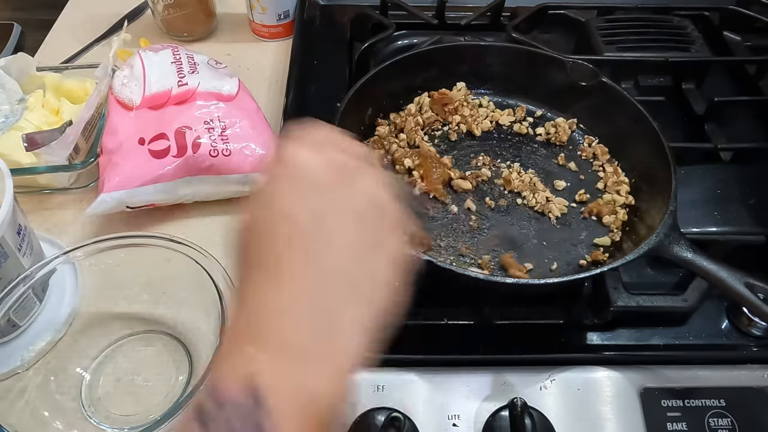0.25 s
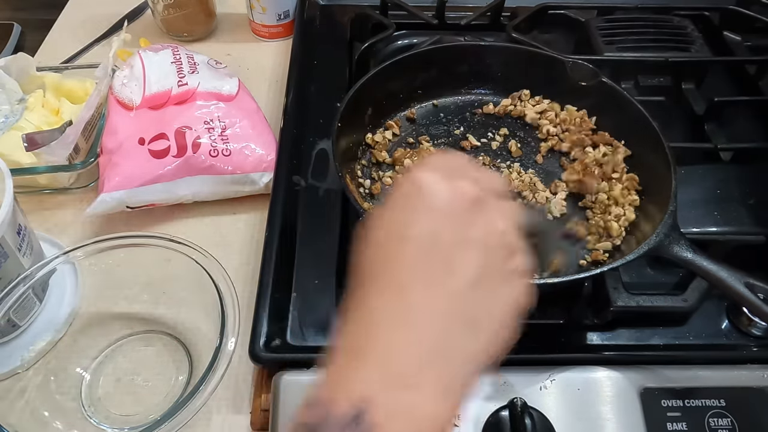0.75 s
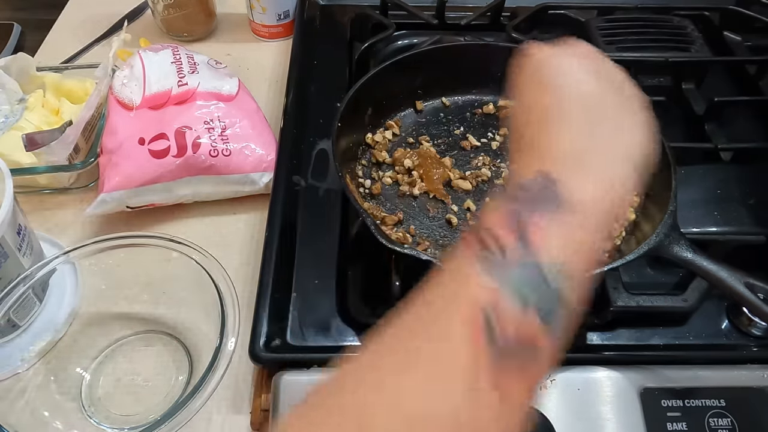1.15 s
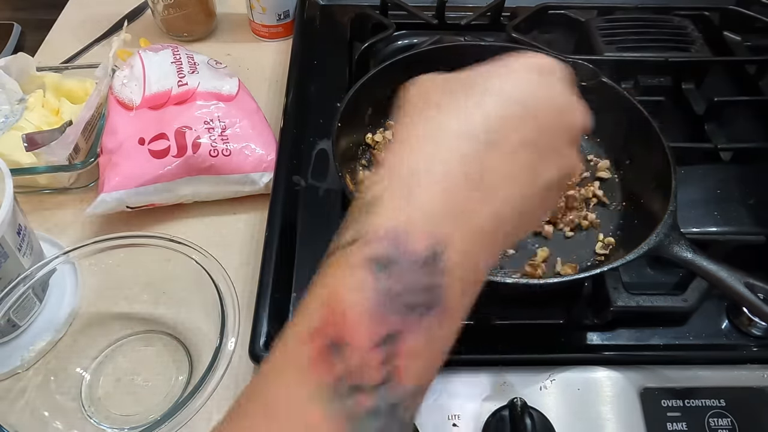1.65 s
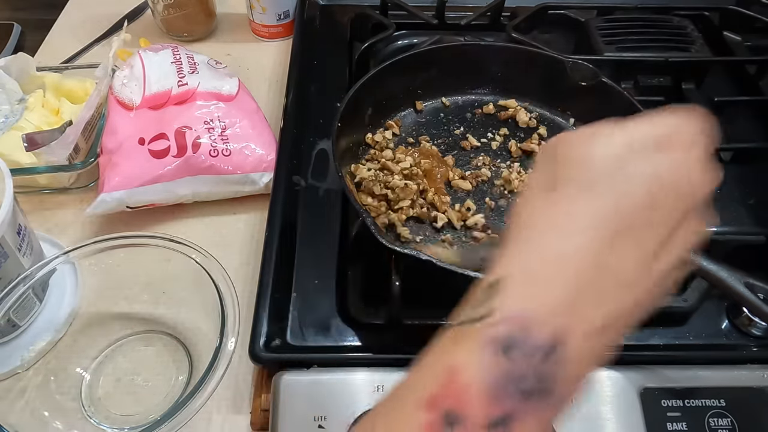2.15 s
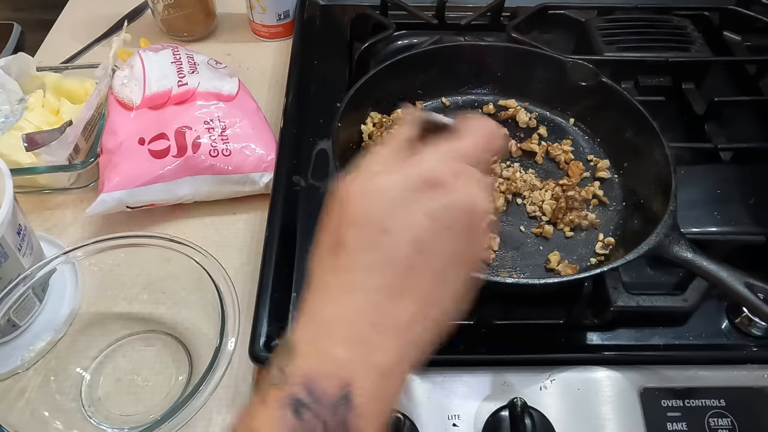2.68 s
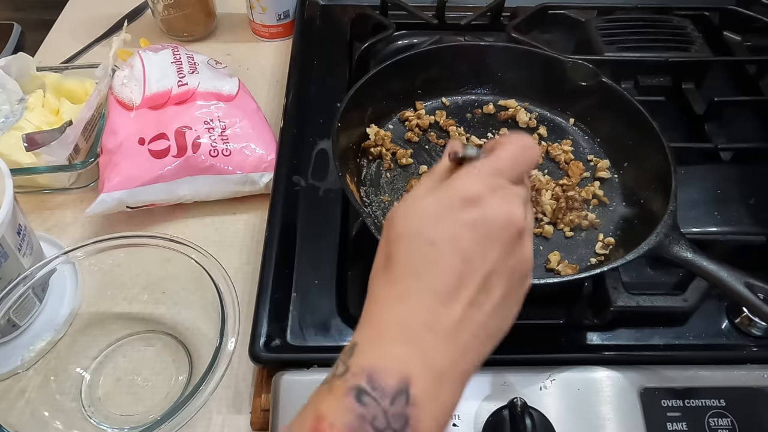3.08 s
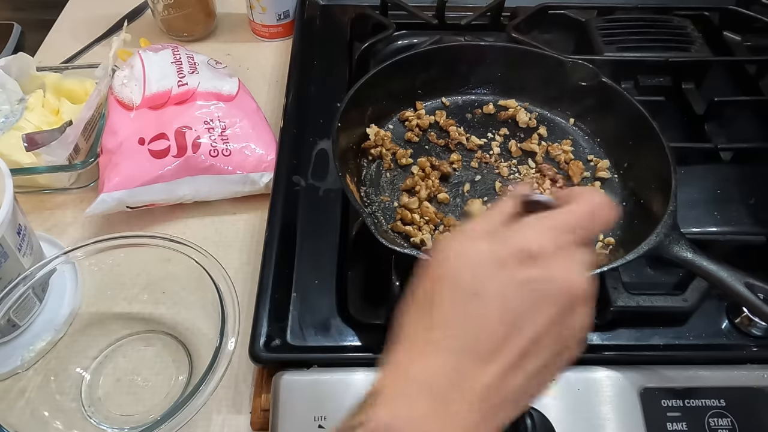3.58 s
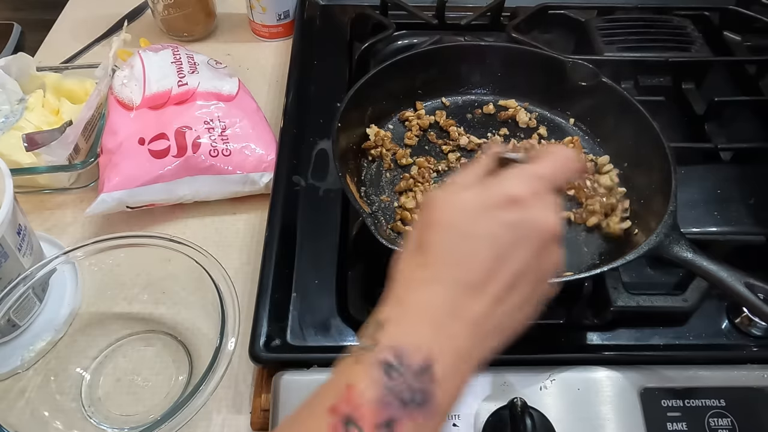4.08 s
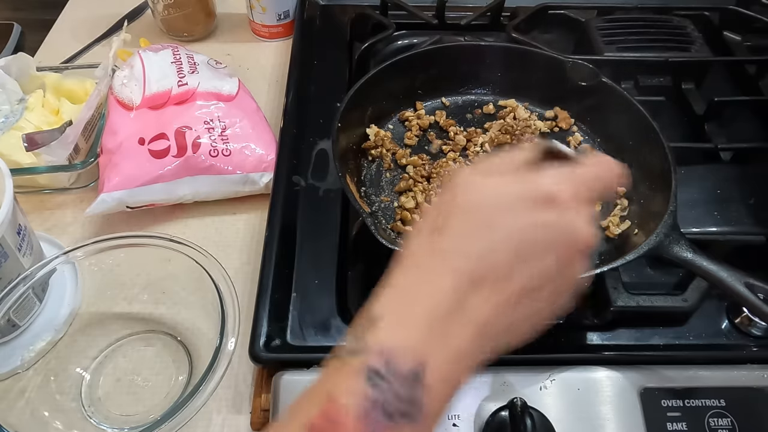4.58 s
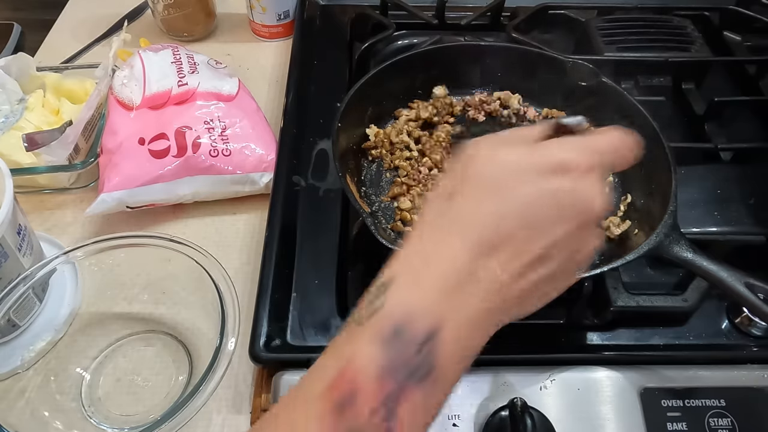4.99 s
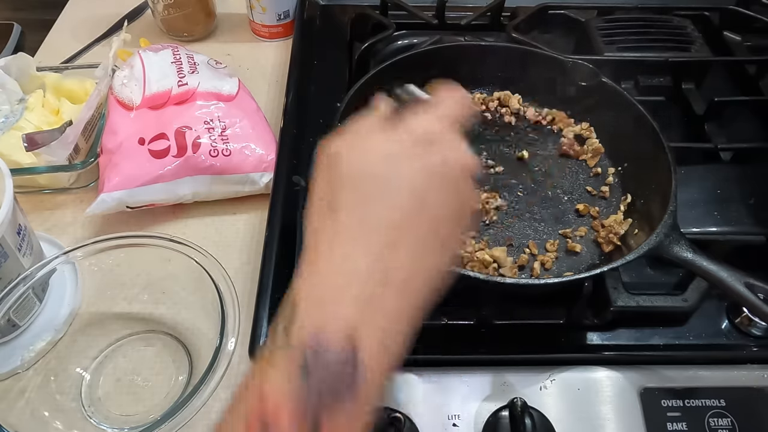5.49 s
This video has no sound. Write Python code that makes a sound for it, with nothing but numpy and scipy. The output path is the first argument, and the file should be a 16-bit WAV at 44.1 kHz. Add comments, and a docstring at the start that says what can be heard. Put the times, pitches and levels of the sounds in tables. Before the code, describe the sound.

Close stereo sound of a small kitchen: honeyed nuts sizzle and spit steadily in an iron skillet, slightly right. A metal spoon scrapes busily in the first second with small squeaks and clinks, then a bright rim strike, short bursts around one and a half and two seconds, a sparse frying stretch, another scrape, a sharp ringing clank at four seconds and a few late light taps over low room hum.

```python
"""A small kitchen: chopped walnuts and honey sizzle gently in a cast-iron skillet on a gas stove.
A metal spoon scrapes by stick and slip, squeaks, crunches nuts, and strikes the floor and rim of the iron.
Honey crackles as many small bubbles burst, larger ones spit, and the finest merge into hiss.
Hard pushes shift the skillet on its grate, and the sheet-metal stove top booms, groans and rattles.
Two microphone ports hear the pan a little to the right, with short reflections and a low room hum."""
import sys
import numpy as np
from scipy import signal
from scipy.fft import rfft, irfft
from scipy.io import wavfile
from scipy.ndimage import uniform_filter1d, map_coordinates

SR = 44100
rng = np.random.default_rng(int(sys.argv[2]) if len(sys.argv) > 2 else 0)


def bounce(signal):
    """Save signal as a 16-bit WAV file at the path given by the first command-line argument."""
    frames = np.transpose(np.atleast_2d(signal))
    limited = np.clip(frames, -1, 1)
    pcm = np.round(limited * 32767).astype(np.int16)
    wavfile.write(sys.argv[1], SR, pcm)


N = 253134  # samples

# All db columns are relative: settings in the functions and the microphone placing shift them further.
# Spoon strokes on the iron: start_s, length_s, judder_db, scrape_db, whine_db, grit_db
STROKE_TABLE = [(0.025, 0.075, -53, -43.5, -42.5, -45), (0.102, 0.089, -39, -36, -39.5, -50),
                (0.148, 0.036, -28, -20.5, -29, -27.5), (0.188, 0.01, -32, -16, -27, -38),
                (0.214, 0.026, -38, -25.5, -30, -30), (0.242, 0.006, -43, -32, -38, -50),
                (0.292, 0.061, -51, -58, -37.5, -55), (0.352, 0.035, -51, -32.5, -35.5, -35.5),
                (0.386, 0.009, -49, -34, -38, -42), (0.454, 0.11, -51, -48, -45, -44),
                (0.544, 0.039, -52, -34, -38.5, -33), (0.6, 0.017, -48, -27.5, -39, -34),
                (0.64, 0.13, -49, -42.5, -46, -51), (0.744, 0.015, -40, -32.5, -33, -50),
                (0.774, 0.0095, -34.5, -24.5, -30, -54), (0.8, 0.008, -36, -34, -29, -52),
                (0.812, 0.031, -36.5, -26, -32.5, -39.5), (0.843, 0.021, -52, -40, -41, -38),
                (1.162, 0.059, -38, -38.5, -44.5, -53), (1.24, 0.076, -40.5, -46, -50, -42),
                (1.439, .035, -49, -34, -50, -50), (1.475, 0.048, -52, -29, -37, -37.5),
                (1.526, 0.064, -49, -29.5, -31.5, -34.5), (1.594, 0.045, -32, -41, -35, -39),
                (2.112, .022, -26, -29, -40, -52), (2.175, 0.045, -36.5, -32, -34, -38.5),
                (2.229, 0.074, -41, -43, -35, -40), (2.338, 0.1, -51.5, -59, -48.5, -46.5),
                (2.629, 0.031, -47.5, -52, -40, -44), (2.648, 0.043, -54, -41, -47, -44),
                (3.492, 0.091, -52, -58, -68, -67), (3.785, 0.029, -33.5, -37, -30, -49),
                (3.82, 0.038, -29.5, -37, -50, -40), (4.107, .055, -40, -43, -42, -42),
                (4.17, 0.037, -33.5, -38, -32, -36), (4.227, 0.069, -32.5, -43, -41, -45),
                (4.679, 0.048, -41.5, -48, -51, -47), (4.704, 0.043, -51, -47, -39, -41.5),
                (4.736, 0.015, -53.5, -35, -46, -54), (4.879, 0.04, -50, -43, -48, -45),
                (4.928, 0.066, -44.5, -39.5, -39.5, -43), (5.005, 0.045, -29.5, -35, -39.5, -41),
                (5.286, 0.012, -62, -45, -41.5, -44.5), (5.424, 0.014, -68, -44, -39, -43)]
# Resonances of the spoon pressed on the iron, low to high, four tables: pitch_hz, width_hz, level_db
JUDDER_MODES = [(621, 18.7, 0.5), (687.3, 22, 1), (792.5, 29, -4)]
SCRAPE_MODES = [(1206, 39.3, 3), (1231, 29.5, 5.5), (1285, 29, -1), (1366, 95, -11.5)]
WHINE_MODES = [(1833.5, 12.4, 7), (1912, 26, 4), (2030, 275, -7)]
GRIT_MODES = [(2715, 50, 6), (2820, 74, 3), (3280, 58, 2.5), (3790, 190, -6.5), (4100, 61, 0),
              (4775, 53, -7), (4950, 53, -3), (5400, 33, -10), (6230, 46, -8)]
# Moments when slipping locks onto one resonance: middle_s, length_s, pitch_hz, level_db
SQUEAK_TABLE = [(0.199, .013, 1240, -20), (0.237, 0.012, 2800, -33), (.374, 0.0087, 2760, -32),
                (.404, .022, 3340, -34), (0.417, 0.021, 1890, -30.5), (.782, .016, 1900, -32),
                (0.841, 0.021, 2900, -35), (1.265, 0.026, 3900, -34), (1.268, 0.03, 7250, -37.5),
                (1.514, 0.0097, 1230, -24.5), (1.508, 0.018, 2790, -28.5), (1.577, 0.028, 1235, -28.5),
                (1.59, 0.012, 2800, -31), (1.594, 0.012, 4740, -31), (2.197, .028, 2770, -30.5),
                (2.237, 0.012, 3930, -35.5), (3.849, 0.019, 690, -29), (4.24, 0.017, 792, -32),
                (4.26, 0.017, 730.5, -33)]
# The spoon leaves the iron and rings freely: start_s, level_db
LIFT_TABLE = [(.9, -45), (3.91, -32.5), (4.31, -38), (5.1, -41)]
# Nut pieces crunching under the spoon: middle_s, length_s, level_db
CRUNCH_TABLE = [(0.183, 0.017, -51), (0.39, .05, -48), (0.576, 0.028, -46), (1.136, 0.03, -37),
                (1.271, 0.027, -35), (1.563, 0.091, -45), (2.23, 0.038, -38.5), (2.3, 0.039, -40.5),
                (4.202, 0.033, -59), (4.925, 0.072, -41.5), (5.026, 0.071, -38.5), (5.402, 0.021, -49)]
# Spoon blows and skillet bumps on the grate: start_s, level_db, contact_brightness_hz, spoon_ring_db,
# skillet_ring_db, stove_thud_db, rim_nearness (0 floor to 1 rim), crack_db
KNOCK_TABLE = [(0.153, -28.5, 2440, 1, -29, -34, 0, 18), (.182, -21.5, 2180, 6.5, -19, -32, 0.13, 9.5),
               (.231, -30, 5000, 7, -37, -21, 0, 2), (0.2682, -19.5, 5200, 9.5, -25.5, -23, 0, 11),
               (.371, -28, 4000, 6, -40, -27, 0.4, 10), (0.538, -28, 7000, 10, -41, -10, .4, 2),
               (.744, -30, 3480, 10, -32, -16, 0.2, 9), (0.775, -43, 2160, -1, -24, -19, 0.1, 5),
               (0.826, -35, 3200, 4, -32, -14, .1, 4), (1.0633, -21, 5750, 13, -17.5, -3, 0.9, 22),
               (1.444, -31.5, 2200, 5, -24, -10, 0.1, 3), (1.509, -38, 4000, -3, -26, -12, 0.1, -4),
               (1.594, -22, 4030, 2, -19, -32, 0.4, 1), (1.603, -37, 5000, 5, -28, -23, 0.4, 8),
               (1.614, -28, 2650, -14, -1.5, -25, 0.26, 9), (2.1147, -12.5, 2600, 3, -41, -6.5, 0.1, 4),
               (2.1306, -22, 4470, 3, -30, 1, 0.6, 13), (2.134, -28, 5000, 8, -21, -25, 0.3, 12),
               (2.188, -40, 4070, 0, -33, -7, 0, 0), (2.209, -29, 5000, 4, -36, -7, .2, 18),
               (2.2404, -30, 6000, 5, -32, -12, .2, 15), (2.276, -31.5, 484, -8, 0.5, -6, 0.07, -3),
               (2.383, -41, 3550, 8, -38, -1, 0.1, 2), (3.793, -31.5, 2200, 11.5, -22, -14, 0.3, -10),
               (4.0292, -8, 13300, -2.5, -12, -12, 1, 13), (4.18, -33, 4500, 9, -45, -20, .3, 4),
               (4.283, -26, 2980, -0.5, -27, -23, 0.5, 8), (4.73, -41.5, 600, -10, -17, 10.5, 0, -10),
               (4.978, -30, 2590, 2, -26, -20, 0, -1)]
# Spectrum of the dense, quickly dying clank of a blow: pitch_hz, level_db (per Hz)
CLANK_SPECTRUM = [(300, -38), (700, -5.5), (1000, -17.5), (1500, -9), (2500, -13.5), (4700, -9.5),
                  (7200, -14), (10000, -18), (15000, -36)]
# Modes of the spoon after a blow: pitch_hz, t60_s, level_db
SPOON_MODES = [(643, 0.16, -12.5), (1202, 0.11, -7), (1897, 0.054, -2.5), (2730, 0.074, 1),
               (3263, 0.11, -9.5), (3720, 0.11, -8), (4130, 0.087, -11), (4663, 0.069, -2.5),
               (4880, 0.2, -9.5), (5320, 0.15, -11.5), (6030, 0.13, -13), (7600, .18, -13.5)]
# Modes of the skillet: pitch_hz, t60_s, rim_db (struck on the rim), floor_db (struck on the floor)
SKILLET_MODES = [(301, .8, -22, -10), (480, 1.0, -27, -4), (1147, 1.2, -28, -1), (1215, .3, -9, -20),
                 (1444, .95, -17, 1), (1639, 1.45, -3.5, -1), (2002, .68, -1, -13), (2075, .8, -9, -20),
                 (2198, 1.0, -4, -6), (2525, .4, -19, -25), (2636, .8, -13, -20), (2826, 1.0, -22, -11),
                 (3310, .14, -6, -20), (3424, .72, -6.5, -20), (4049, .5, -15, -25), (4522, .39, -15, -25),
                 (4712, .48, -2.5, -13), (4787, .38, -5, -20), (4974, .28, -16, -25), (5076, .15, -4, -25),
                 (5383, .19, -11, -25), (5535, .4, -11, -28), (6182, .3, -6, -26), (6557, .35, -18, -30),
                 (6901, .16, -4, -28), (7052, .18, -9, -28), (7273, .27, -13, -30), (8484, .2, -18, -35),
                 (8569, .22, -9, -35), (9850, .15, -15, -40), (10060, .14, -13, -40)]
# Honey frying over time: time_s, sizzle_db
FRYING_CURVE = [(0.0, -43.5), (1.45, -43.5), (1.95, -47.5), (2.3, -47.5), (2.51, -47), (2.8, -48),
                (3.2, -46.5), (3.35, -44), (3.62, -45.5), (3.72, -41), (3.97, -42), (4.25, -48.5),
                (4.54, -46.5), (4.84, -44.5), (5.5, -46.5), (5.74, -44)]
# Colour of the sizzle: pitch_hz, level_db (per Hz)
SIZZLE_SPECTRUM = [(300, -18), (600, -21), (950, -12), (1300, -1), (1700, -4.5), (2400, 0.5), (3200, 0),
                   (4200, 1.5), (7300, -0.5), (8200, -8.5), (10200, -6.5), (12500, -11), (14000, -17),
                   (15500, -40)]
# Fresh honey spreading over bare hot iron with a fine hiss: time_s, level_db
FLARE_CURVE = [(0, -70), (3.2, -66), (3.45, -54), (3.66, -52), (3.76, -48), (3.99, -45), (4.1, -70),
               (5.74, -75)]
# The loudest bubbles that spit: start_s, peak_db, starting_pitch_hz, decay_s (to 1/e)
SPIT_TABLE = [(.464, -27, 7540, .0008), (0.6605, -24, 4900, .0006), (0.753, -35, 4750, 0.00072),
              (.905, -19.5, 7600, 0.0007), (.978, -23, 7000, 0.00056), (1.266, -30, 4100, 0.00091),
              (1.322, -25, 1900, 0.00061), (1.7203, -18.5, 6100, 0.00071), (1.845, -23, 6400, 0.0007),
              (1.892, -20.5, 2800, .0013), (1.947, -23, 7200, .0005), (1.978, -21, 7340, 0.00074),
              (2.402, -25, 4700, 0.00062), (2.443, -24, 7000, 0.00056), (2.53, -26, 7360, 0.00044),
              (2.5477, -23.5, 4100, .0007), (2.675, -23, 6900, .001), (2.777, -21, 6530, 0.00074),
              (2.888, -19, 7100, .0004), (2.916, -23.5, 4300, 0.0011), (2.994, -23.5, 4200, .0005),
              (3.009, -26, 7100, .0007), (3.028, -24, 4900, 0.00066), (3.085, -26, 7500, 0.00092),
              (3.135, -31, 2380, 0.0011), (3.229, -25, 7350, 0.00053), (3.273, -27.5, 2730, .0025),
              (3.3997, -23, 5400, 0.00035), (3.57, -25.5, 2430, .0013), (3.597, -21, 7700, 0.00055),
              (3.737, -25, 7400, .0007), (3.949, -23, 2600, .001), (4.323, -20, 4550, 0.00046),
              (4.423, -28, 5500, 0.00046), (4.583, -24, 12000, 0.0013), (4.6538, -23, 3770, 0.00029),
              (4.718, -21, 6040, 0.00062), (4.803, -20, 5900, 0.00068), (4.9138, -21, 6570, 0.00043),
              (4.931, -20, 2470, .0008), (4.973, -25, 5500, .0006), (5.094, -27, 9500, 0.00034),
              (5.183, -32, 5500, .0008), (5.234, -28, 2900, .0007), (5.358, -23.5, 7100, .0007),
              (5.4204, -15.5, 6800, .0007), (5.558, -29, 4400, 0.00045), (5.584, -24, 2580, 0.0014),
              (5.6185, -21, 5270, 0.00032), (5.6751, -23, 6800, 0.00064), (5.687, -25.5, 2620, .0012),
              (5.715, -21, 4450, 0.00068)]
# Shoves of the skillet over the grate: start_s, length_s, boom_db, groan_db, rattle_db
SHOVE_TABLE = [(0.17, 0.11, -58.5, -50.5, -61), (0.376, 0.092, -54, -42.5, -43),
               (0.48, 0.024, -44, -47, -49), (0.544, 0.1, -50, -50, -47.5),
               (0.76, .08, -48.5, -47.5, -40.5), (1.077, 0.022, -42, -38, -40),
               (1.111, 0.032, -42, -35.5, -35.5), (1.153, 0.067, -40, -36, -49),
               (1.244, 0.041, -45.5, -45, -40), (1.359, 0.037, -47, -49, -69), (1.462, 0.14, -54, -41, -45),
               (1.588, 0.066, -41.5, -35, -37.5), (2.118, 0.044, -40, -38.5, -46),
               (2.24, 0.053, -44.5, -37.5, -40.5), (4.023, 0.041, -37, -33, -31),
               (4.268, 0.015, -59, -53, -63)]
# Resonances of the stove top and grate, three tables: pitch_hz, width_hz, level_db
BOOM_MODES = [(81.5, 2.7, -11), (139.4, 6.7, 3), (168.6, 13.4, 1.5), (210, 20.5, 0.5), (242.4, 11, -7.5),
              (281, 8.9, -9.5)]
GROAN_MODES = [(349.5, 24.5, -1.5), (442, 20.6, -2), (478.7, 23.5, 4), (520, 55, -6.5)]
RATTLE_MODES = [(601, 84, -3.5), (661, 65, 1), (887, 216, -1.5), (956, 303, -3.5)]
# Spectrum of the kitchen background: pitch_hz, level_db (per Hz)
BACKGROUND_SPECTRUM = [(20, 0), (45, -4), (100, -20), (135, -3), (210, 5.5), (300, -0.5), (450, -7.5),
                       (800, -7.5), (1500, -6.5)]
# Left-right likeness of diffuse sound at the two ports: pitch_hz, likeness (0-1)
PORT_LIKENESS = [(100, 0.89), (1000, 0.51), (4000, 0.43), (8000, 0.77), (12000, 0.21), (15000, 0.17)]
# Decay of the kitchen's reflections: pitch_hz, t60_s
ROOM_DECAY = [(150, 0.29), (1000, 0.31), (4000, 0.21), (12000, 0.11)]
# Response of the right microphone port, duller at the very top: pitch_hz, level_db
RIGHT_PORT_RESPONSE = [(9000, -2), (11000, -6), (12500, -8.5), (15000, -5)]

# A stroke bites quickly, holds and dies away when the spoon lifts
STROKE_ATTACK_S, STROKE_RELEASE_DB_PER_S = 0.01, 490
DRAG_DB = -70  # between strokes the spoon only trails through the nuts
# A shove sets the skillet sliding; the stove top rumbles on after it stops
SHOVE_ATTACK_S, SHOVE_RELEASE_DB_PER_S = 0.013, 175
TREMBLE_DB = -73.5  # stirring alone keeps the grate trembling
SPOON_HZ, SPOON_T60_S = 623, 0.38  # lowest mode of the free spoon
# Lesser spits at random moments
SPITS_PER_S, SPIT_DB, SPIT_SPREAD_DB = 26, -35.5, 2.5
SPIT_HZ, SPIT_SPREAD_OCTAVES, SPIT_DECAY_S = 5440, 0.596, 0.00092
CUTOFF_HZ = 15600


def from_db(db):
    """Decibels to gain."""
    return 10 ** (np.asarray(db) / 20)


def rms_one(x):
    """Scale to unit rms."""
    return x / np.sqrt(np.mean(x ** 2) + 1e-20)


def in_time(rows):
    """Read a two-column curve of time and level at every sample."""
    time_s, level = np.transpose(rows)
    return np.interp(np.arange(N) / SR, time_s, level)


def at_hz(points, hz):
    """Read a curve on a log-frequency axis."""
    points = np.array(points)
    return np.interp(np.log(np.maximum(hz, 1)), np.log(points[:, 0]), points[:, 1])


def colour(x, spectrum):
    """Filter a signal by a spectrum in decibels."""
    count = x.shape[-1]
    gain = from_db(at_hz(spectrum, np.fft.rfftfreq(count, 1 / SR)))
    return irfft(rfft(x) * gain, count)


def band(x, low_hz, high_hz, order=1):
    """Causal band-pass."""
    edges = [low_hz, min(high_hz, SR / 2 - 1000)]
    return signal.sosfilt(signal.butter(order, edges, "band", fs=SR, output="sos"), x + 1e-18)


def drift(knots_per_s):
    """Random wandering of unit rms, straight lines between random knots."""
    knots = rng.standard_normal(8192)
    return rms_one(np.interp(np.arange(N) / SR * knots_per_s, np.arange(len(knots)), knots))


def grains(per_s, spread_db):
    """Clicks at random moments, most small and a few large."""
    sizes = from_db(spread_db * np.minimum(rng.exponential(1, N), 5))
    signs = rng.choice([-1, 1], N)
    return sizes * signs * (rng.random(N) < per_s / SR)


def resonate(x, modes):
    """Parallel resonances of (pitch_hz, width_hz, level_db) with alternating signs."""
    out = 0
    for k, (hz, width, db) in enumerate(modes):
        r = np.exp(-np.pi * width / SR)  # pole radius
        gain = (-1) ** k * from_db(db) * (1 - r * r) / 2
        feedback = [1, -2 * r * np.cos(2 * np.pi * hz / SR), r * r]
        out = out + signal.lfilter([gain, 0, -gain], feedback, x + 1e-18)
    return out


def even(x, size):
    """Unit level over a moving window of samples, with the fine grain kept."""
    return x / np.sqrt(np.maximum(uniform_filter1d(x * x, size), 0) + 1e-20)


def add(out, start_s, sound):
    """Mix a sound in at a given time."""
    start = int(max(start_s, 0) * SR)
    out[start:start + len(sound)] += sound[:N - start]


def pushes(rows, attack_s, release_db_per_s, rest_db):
    """Gain over time of pushes (start_s, length_s, level_db): each rises, holds, then dies away."""
    t = np.arange(0, N, 16) / SR
    power = from_db(rest_db) ** 2
    for start, length, db in rows:
        age = np.maximum(t - start, 0)
        fall_db = release_db_per_s * np.maximum(age - length, 0)
        power = power + (np.minimum(age / attack_s, 1) * from_db(db - fall_db)) ** 2
    return np.interp(np.arange(N) / SR, t, np.sqrt(power))


def waver(x, share=0.008, changes_per_s=12):
    """Resonances wander in pitch, as when contact point and pressure change, by uneven playback speed."""
    position = np.cumsum(1 + share * drift(changes_per_s))
    return map_coordinates(x, [position], order=1, mode="wrap")


def scrape(slips_per_s=520, spread_db=5.0, jerk_db=1.3, wobble_db=0.7, level_db=-1, rasp_db=-16):
    """The spoon sticks and slips; slips kick its resonances, and each stroke's grip decides which speak."""
    slips = grains(slips_per_s, spread_db)
    start, length, *levels = np.transpose(STROKE_TABLE)
    mode_sets = (JUDDER_MODES, SCRAPE_MODES, WHINE_MODES, GRIT_MODES)
    voices = [waver(resonate(slips, modes)) for modes in mode_sets]
    voices[-1] = voices[-1] + from_db(rasp_db) * colour(slips, CLANK_SPECTRUM)
    out = 0
    for db, voice in zip(levels, voices):
        gain = pushes(zip(start, length, db), STROKE_ATTACK_S, STROKE_RELEASE_DB_PER_S, DRAG_DB)
        out = out + gain * even(voice, size=600)
    return from_db(level_db + jerk_db * drift(170) + wobble_db * drift(55)) * out


def chips(taps_per_s=240, spread_db=3.0, level_db=-4, rest_db=-80):
    """Nut pieces driven by each stroke tap against iron and spoon at scattered pitches."""
    start, length, *_, grit_db = np.transpose(STROKE_TABLE)
    taps = 0
    for hz in np.geomspace(900, 7200, 9):
        taps = taps + resonate(grains(taps_per_s, spread_db), [(hz, hz / 6, 0)]) / np.sqrt(hz)
    gain = pushes(zip(start, length, grit_db), STROKE_ATTACK_S, STROKE_RELEASE_DB_PER_S, rest_db)
    return from_db(level_db) * gain * rms_one(taps)


def squeaks(jitter=0.0141, shimmer_db=2.0, overtone_db=-21):
    """Stick and slip fall into step for a moment: an unsteady tone that swells and fades."""
    out, t = np.zeros(N), np.arange(N) / SR
    clock = np.cumsum(1 + jitter * drift(300)) / SR  # uneven time makes the pitch unsteady
    grip = from_db(shimmer_db * drift(250))
    for middle, length, hz, db in SQUEAK_TABLE:
        near = np.abs(t - middle) < 2 * length
        phase = 2 * np.pi * hz * clock[near]
        swell = from_db(db) * np.exp(-(2 * (t[near] - middle) / length) ** 2)
        out[near] += swell * np.sqrt(2) * (np.sin(phase) + from_db(overtone_db) * np.sin(2 * phase))
    return out * grip


def lifts(swell_s=0.004):
    """Off the iron, the spoon hums on in its lowest mode."""
    out, t = np.zeros(N), np.arange(SR) / SR
    decay = np.exp(-np.log(1000) * t / SPOON_T60_S)
    hum = np.sin(2 * np.pi * SPOON_HZ * t) * (1 - np.exp(-t / swell_s)) * decay
    for start, db in LIFT_TABLE:
        add(out, start, from_db(db) * hum)
    return out


def crunches(cracks_per_s=1500, spread_db=3.5, low_hz=1800, high_hz=9000):
    """Brittle pieces crack in a short cluster of dry ticks."""
    t = np.arange(N) / SR
    pressure = 0
    for middle, length, db in CRUNCH_TABLE:
        pressure = pressure + from_db(db) * np.exp(-(2 * (t - middle) / length) ** 2)
    cracks = colour(grains(cracks_per_s, spread_db), CLANK_SPECTRUM)
    return pressure * even(band(cracks, low_hz, high_hz), size=1500)


def knocks(clank_s=0.017, clank_db=-8, tail_s=0.045, tail_db=-16, spoon_db=-1, grip_shift=0.0063,
           mode_spread_db=2.0, thud_db=-8, count=70):
    """A blow cracks, clanks with a tail of crowded metal modes, rings the held spoon and thuds the stove."""
    out, t = np.zeros(N), np.arange(SR // 2) / SR
    click = signal.unit_impulse(len(t))
    crowded_hz = 600 + 11000 * (np.arange(count) + rng.random(count)) / count
    crowded = np.sin(2 * np.pi * crowded_hz[:, None] * t)
    thud = band(resonate(click, BOOM_MODES), 53, 670, order=2)
    thud = thud / np.abs(thud).max()
    mode_hz, t60, mode_db = np.transpose(SPOON_MODES)
    mode_decay = np.exp(-np.log(1000) * t / t60[:, None])  # damped by the hand
    for start, db, contact_hz, ring_db, _, stove_db, _, crack_db in KNOCK_TABLE:
        noise = rng.standard_normal(len(t))
        burst = rms_one(band(colour(noise, CLANK_SPECTRUM), 410, contact_hz))
        mixed_modes = rng.choice([-1, 1], count) @ crowded
        tail = rms_one(band(colour(mixed_modes, CLANK_SPECTRUM), 410, contact_hz))
        clank = burst * np.exp(-t / clank_s) + from_db(tail_db) * tail * np.exp(-t / tail_s)
        crack = band(click, contact_hz / 5, contact_hz * 0.67, order=2)  # the first instant of contact
        clank = clank + from_db(crack_db + 1.5) * crack / np.abs(crack).max()

        strength = from_db(mode_db + mode_spread_db * rng.standard_normal(len(mode_hz)))
        strength = strength / np.hypot(1, mode_hz / contact_hz)  # a soft contact excites less treble
        phase = 2 * np.pi * mode_hz[:, None] * (1 + grip_shift * rng.standard_normal()) * t
        spoon = (strength * rng.choice([-1, 1], len(mode_hz))) @ (np.sin(phase) * mode_decay)
        spoon = spoon / np.abs(spoon).max()

        blow = from_db(clank_db) * clank + from_db(spoon_db + ring_db) * spoon
        add(out, start, from_db(db) * (blow + from_db(thud_db + stove_db) * thud))
    return out


def skillet(level_db=2.5, twin_db=-13, split=0.00408):
    """Iron modes beat with close twins; the place and hardness of each blow decide which speak."""
    out, t = np.zeros(N), np.arange(3 * SR // 2) / SR
    hz, t60, rim_db, floor_db = np.transpose(SKILLET_MODES)
    phase = 2 * np.pi * hz[:, None] * t
    beating = np.sin(phase) + from_db(twin_db) * np.cos(phase * (1 + split))
    modes = beating * np.exp(-np.log(1000) * t / t60[:, None])
    signs = (-1) ** np.arange(len(hz))
    for start, db, contact_hz, _, ring_db, _, rim, _ in KNOCK_TABLE:
        place_db = rim * rim_db + (1 - rim) * floor_db
        strength = from_db(db + ring_db + level_db + place_db) / np.hypot(1, (hz / contact_hz) ** 2)
        add(out, start, (strength * signs) @ modes)
    return out


def sizzle(bursts_per_s=300, spread_db=2.0, clump_db=3.5, hiss_db=-3.0, flutter_db=1.0, level_db=3.0):
    """Steam bubbles burst in the honey as ticks of many pitches; the smallest merge into hiss."""
    per_s = bursts_per_s * from_db(clump_db * drift(40))  # in each pitch band
    ticks = 0
    for hz in np.geomspace(1100, 13000, 11):
        ticks = ticks + band(grains(per_s, spread_db), hz / 1.186, hz * 1.195)
    crackle = kitchen(rms_one(colour(ticks, SIZZLE_SPECTRUM)), wet_db=-13.5)
    hiss = rms_one(colour(two_ports(*rng.standard_normal((2, N))), SIZZLE_SPECTRUM))
    gain = from_db(in_time(FRYING_CURVE) + level_db + flutter_db * drift(18))
    return gain * (crackle + from_db(hiss_db) * hiss)


def flare(low_hz=4200, high_hz=12000):
    """The very finest bubbles merge into a bright hiss."""
    hiss = band(two_ports(*rng.standard_normal((2, N))), low_hz, high_hz, order=2)
    return from_db(in_time(FLARE_CURVE)) * rms_one(hiss)


def spits(rough=0.4, rise_per_s=25):
    """A larger bubble snaps open with a puff of steam and rings briefly, rising in pitch."""
    out, t = np.zeros(N), np.arange(SR // 50) / SR
    events = list(SPIT_TABLE)
    for _ in range(int(SPITS_PER_S * N / SR)):
        a, b, c = rng.standard_normal(3)
        hz = min(SPIT_HZ * 2 ** (SPIT_SPREAD_OCTAVES * b), 12000)
        decay_s = SPIT_DECAY_S * 2 ** (0.5 * c)
        events.append((rng.random() * N / SR, SPIT_DB + SPIT_SPREAD_DB * a, hz, decay_s))
    puffs = rms_one(colour(rng.standard_normal((len(events), len(t))), SIZZLE_SPECTRUM))
    for (start, db, hz, decay_s), puff in zip(events, puffs):
        ring = np.sin(2 * np.pi * hz * t * (1 + rise_per_s * t / 2)) + rough * puff
        snap = band(ring * np.exp(-t / decay_s), 1570, 11800, order=2)
        add(out, start, from_db(db) * snap / np.abs(snap).max())
    return out


def rumble(bumps_per_s=260, spread_db=2.5, grind_db=-11, level_db=-1):
    """The skillet bumps and grinds over the grate: the stove top booms, the grate groans and rattles."""
    start, length, *levels = np.transpose(SHOVE_TABLE)
    contact = rms_one(grains(bumps_per_s, spread_db)) + from_db(grind_db) * rng.standard_normal(N)
    boom = band(resonate(contact, BOOM_MODES), 124, 540, order=2)
    groan = waver(resonate(contact, GROAN_MODES), share=0.02514)
    rattle = band(resonate(contact, RATTLE_MODES), 310, 2300, order=2)
    out = 0
    for db, voice in zip(levels, (boom, groan, rattle)):
        gain = pushes(zip(start, length, db), SHOVE_ATTACK_S, SHOVE_RELEASE_DB_PER_S, TREMBLE_DB)
        out = out + gain * even(voice, size=1500)
    return from_db(level_db) * out


def room_hum():
    """The low kitchen background: coloured noise spread over both ports, at unit rms."""
    noise = colour(two_ports(*rng.standard_normal((2, N))), BACKGROUND_SPECTRUM)
    return rms_one(band(noise, 16, 1220, order=2))


def two_ports(mid, side):
    """Mix a shared and an opposed signal so that left and right are as alike as the table says."""
    count = len(mid)
    alike = at_hz(PORT_LIKENESS, np.fft.rfftfreq(count, 1 / SR))
    shared = np.sqrt((1 + alike) / 2) * rfft(mid)
    opposed = np.sqrt((1 - alike) / 2) * rfft(side)
    return irfft(shared + opposed * [[1], [-1]], count)


def kitchen(x, wet_db, build_s=0.00068, width_db=9):
    """Direct sound plus diffuse reflections with a decay time for each band."""
    t, tails = np.arange(SR // 2) / SR, 0
    edges = np.geomspace(80, 18000, 8)
    for low, high in zip(edges, edges[1:]):
        fade = from_db(-60 * t / at_hz(ROOM_DECAY, np.sqrt(low * high)))
        tails = tails + band(rng.standard_normal((2, len(t))), low, high, order=2) * fade
    tails = tails * (1 - np.exp(-t / build_s))
    tails = tails / np.sqrt(np.sum(tails[0] ** 2))
    echoes = two_ports(tails[0], from_db(width_db) * tails[1])
    return x + from_db(wet_db) * signal.fftconvolve(x[None], echoes, axes=1)[:, :N]


def from_the_right(pair, pan_db=2.0, shadow_hz=3000, direct_share=0.92):
    """The left port hears the pan softer and a trace later, the delay fading toward the treble."""
    left, right = pair
    late = signal.lfilter(*signal.butter(1, shadow_hz, fs=SR), left)
    shadowed = late + direct_share * (left - late)
    return np.array([from_db(-pan_db) * shadowed, from_db(pan_db) * colour(right, RIGHT_PORT_RESPONSE)])


def scene(background_db=-60.0):
    """Spoon, pan and frying lie a little to the right; the stove and the room hum are all around."""
    spoon = scrape() + chips() + squeaks() + lifts() + crunches()
    stirring = kitchen(spoon, wet_db=-7.5, width_db=-1.0)
    stirring = stirring + kitchen(knocks(), wet_db=-5.0, width_db=-2.5) + skillet()
    # the spoon works off centre: the left port hears it one sample later
    stirring = np.array([np.append(0, stirring[0, :-1]), stirring[1]])
    frying = sizzle() + flare() + kitchen(spits(), wet_db=-7, width_db=6)
    stove = kitchen(rumble(), wet_db=-9.5, width_db=-1.5)
    return from_the_right(stirring) + from_the_right(frying) + stove + from_db(background_db) * room_hum()


def record(dry):
    """The loudest peaks are rounded and the top is cut steeply."""
    rounded = dry / (1 + (dry / 0.62) ** 4) ** 0.25
    return signal.sosfilt(signal.ellip(12, 0.1, 90, CUTOFF_HZ, fs=SR, output="sos"), rounded)


dry = scene()
out = record(dry)
bounce(out)
```